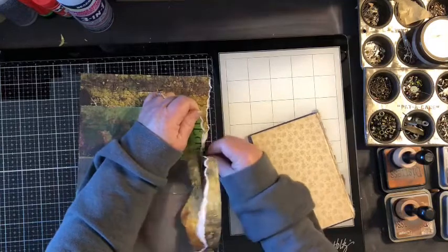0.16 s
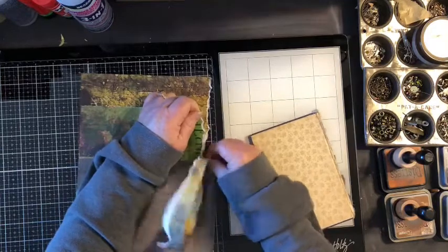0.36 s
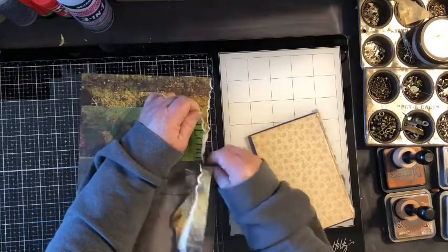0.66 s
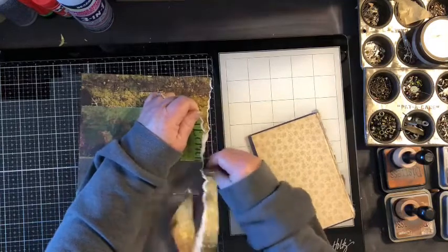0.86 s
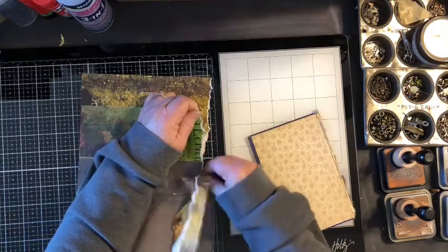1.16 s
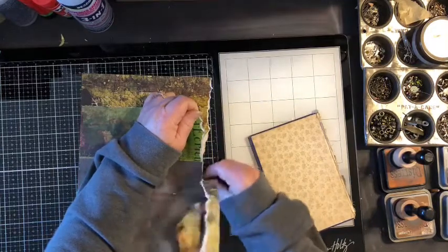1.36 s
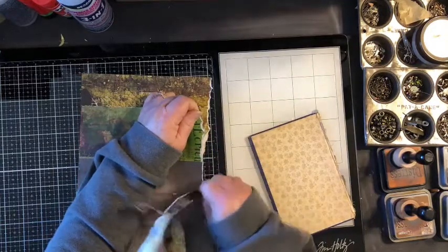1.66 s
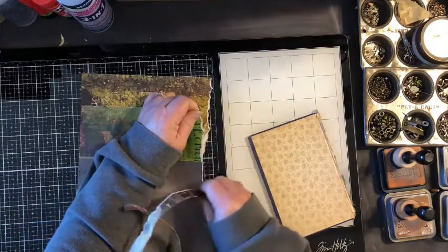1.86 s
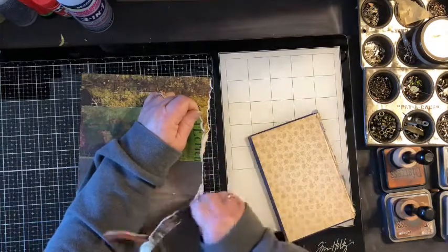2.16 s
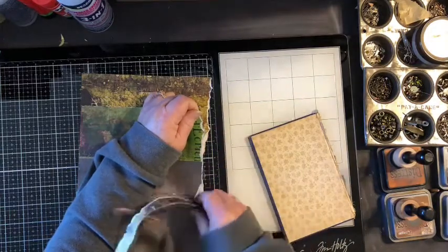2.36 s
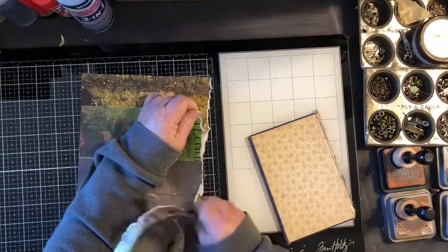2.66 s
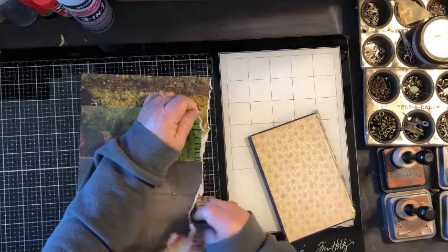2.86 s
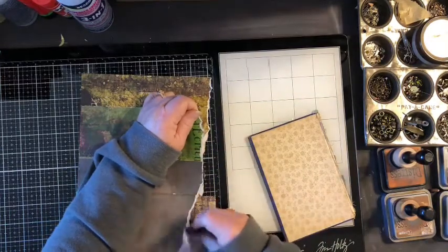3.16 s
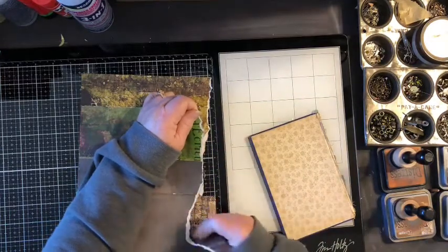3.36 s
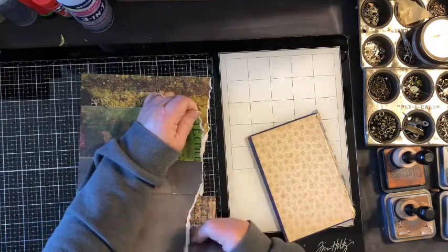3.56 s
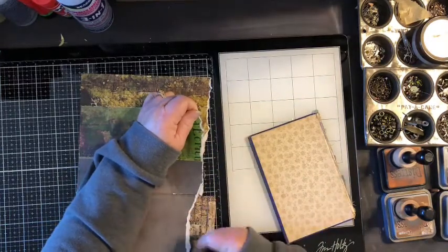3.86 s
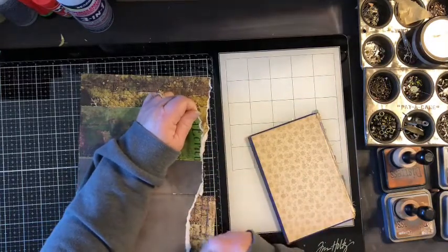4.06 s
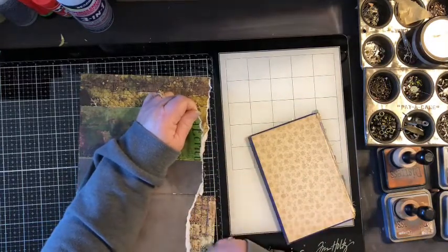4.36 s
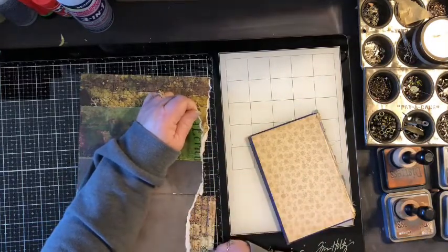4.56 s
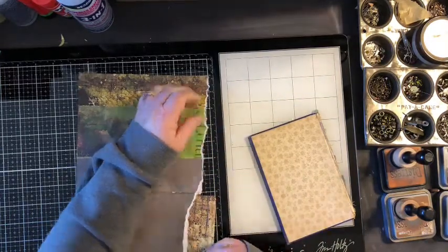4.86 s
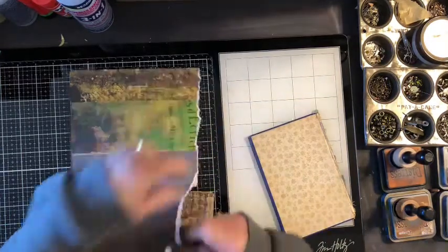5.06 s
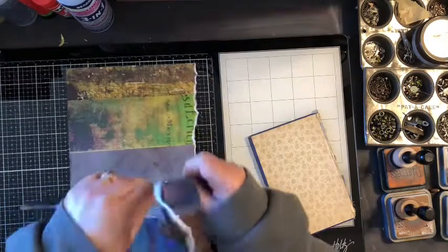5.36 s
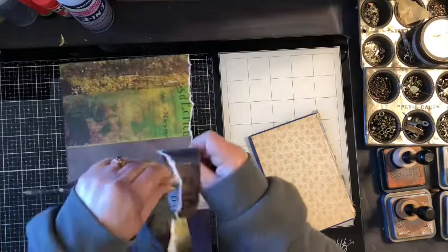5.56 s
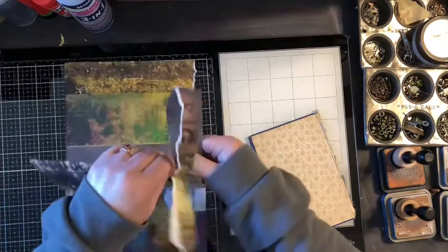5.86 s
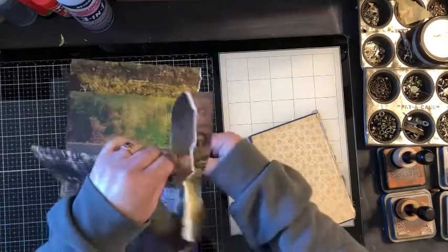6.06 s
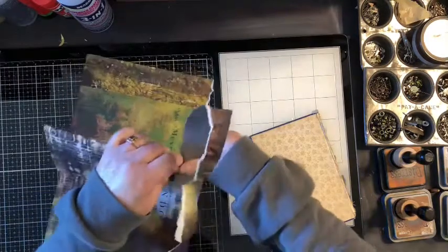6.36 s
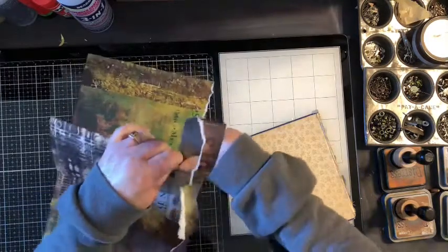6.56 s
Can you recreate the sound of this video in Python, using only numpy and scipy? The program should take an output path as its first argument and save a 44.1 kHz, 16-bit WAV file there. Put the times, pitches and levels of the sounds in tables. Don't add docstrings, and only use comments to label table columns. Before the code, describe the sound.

Close, dry ripping of a paper sheet in sticking, slipping tugs, with crease snaps, soft buckling knocks and rustle above a distant motor's low drone.

```python
import sys
import numpy as np
from scipy import signal
from scipy.fft import rfft, irfft, next_fast_len
from scipy.io import wavfile
from scipy.ndimage import uniform_filter1d

SR = 44100
rng = np.random.default_rng(int(sys.argv[2]) if len(sys.argv) > 2 else 0)


def how_loud(loudness_db):
    steps = np.asarray(loudness_db, float) / 20
    return 10 ** steps


def unload_audio(sound):
    columns = np.transpose(np.atleast_2d(sound))
    steps = np.round(np.clip(columns, -1, 1) * 32767)
    wavfile.write(sys.argv[1], SR, steps.astype(np.int16))


N = 296352
STEP = 16

# pitch_hz, density_db (per Hz)
PAPER_COLOUR = [(110, 12.5), (150, 1), (280, -5.5), (500, -2.5), (800, -4.5), (1260, 0), (1700, -2),
                (2400, -2), (3800, -1), (6500, -2.5), (9000, -6), (13000, -8.5), (16000, -9)]
# time_s, pitch_hz, whole_sheet_db (share that moves along)
LOOSE_STRIP = [(0, 2360, 7), (.55, 2700, 8), (1.2, 2600, 10), (1.45, 3430, 4.5), (1.7, 3040, 5.5),
               (1.93, 4230, 2), (2.3, 3170, 0), (2.7, 3960, 3), (2.92, 2290, 4), (3.08, 4300, 1),
               (3.32, 2000, 9), (3.46, 5300, -6), (3.6, 2600, 11.5), (3.8, 3380, 10.5), (3.97, 2770, 10),
               (4.3, 3520, 11.5), (5.3, 3400, 11.5), (6.72, 3150, 10.5)]


def fibres(per_s, spread_db, clump_db, patchy_db, rustle, strip_db):
    effort_db, bright_db = hands()
    bend_db = bending()
    strip_hz, sheet_db = np.array(in_time(LOOSE_STRIP))[:, ::STEP]
    flex_db = bend_db - 0.1 * effort_db
    body_db = sheet_db + 0.39 * bend_db - 0.16 * effort_db
    shift = [flex_db - flex_db.mean(), body_db - body_db.mean(), 0 * flex_db, bright_db - bright_db.mean()]

    sizes = how_loud(spread_db * np.minimum(rng.exponential(1, N), 4)) * rng.choice([-1, 1], N)
    clicks = sizes * (rng.random(N) < per_s / SR)
    source = rms_one(clicks) + rustle * rng.standard_normal(N)
    clumps_db = clump_db * (jitter(120.0) + 0.061 * jitter(320))
    flicker = [jitter(14.0) + 0.76 * drift(3.7)[::STEP] for k in range(5)]

    out, power = 0, 0
    for k, (hz, band) in enumerate(bands([source, -source])):
        place = np.interp(np.log(hz), np.log([320, 900, 2000, 5500, 9000]), [0, 1, 2, 2, 3])
        low = min(int(place), 2)
        colour_db = shift[low] + (place - low) * (shift[low + 1] - shift[low])
        colour_db += strip_db * np.exp(-(np.log(hz / strip_hz) / .24) ** 2)
        gain = how_loud(at_hz(PAPER_COLOUR, hz) + colour_db + clumps_db + patchy_db * flicker[k % 5])
        out = out + np.interp(np.arange(N) / STEP, np.arange(len(gain)), gain * how_loud(effort_db)) * band
        power += np.mean(gain ** 2) * np.mean(band ** 2)
    return how_loud(-3.0) * out / np.sqrt(power)


# start_s, length_s, effort_db, swell_db (start to end), brightness_db (of the fibres)
RIPS = [(.012, 0.045, -48, 4.5, -8), (.51, 0.059, -48, -10.5, -4), (.87, 0.097, -49, 3, -8),
        (1.4, 0.21, -51.5, 0, -2), (1.635, 0.11, -50, 0.5, -5.5), (1.79, 0.053, -49.5, 4, -2),
        (1.89, 0.08, -50, 4.5, 0), (1.99, 0.15, -46.5, 3.5, -6), (2.297, 0.02, -50, 4, 8),
        (2.37, 0.15, -55, -7, -2.5), (2.504, 0.061, -47, -5.5, -1), (2.76, 0.2, -49, 2.5, -3),
        (3.13, 0.083, -44.5, 8, 1), (3.23, 0.13, -47.5, -10.5, -3), (3.53, 0.16, -45, 2.5, -1.5),
        (3.815, 0.072, -50.5, 4, 2), (3.91, 0.077, -46.5, 10.5, -2.5), (3.99, 0.13, -46.5, 1, 1),
        (4.27, 0.12, -53, -3.5, 1.5), (4.4, 0.11, -56, 8, 2), (5.11, 0.066, -53.5, -5, -3),
        (6.07, 0.24, -51.5, -0.5, -5)]
# start_s, length_s, effort_db, swell_db
# (start to end), brightness_db (of the fibres)
RUSTLES = [(.08, 0.074, -56.5, -7, -8), (.185, 0.089, -54.5, -6, -4.5), (.3, 0.069, -55, 2, -4),
           (.66, 0.063, -55, 6.5, 3), (.75, 0.092, -52.5, 4.5, -7), (1.04, 0.12, -54, 3.5, 1),
           (1.19, 0.1, -54, 0, -6), (1.345, 0.047, -61, 17, 0), (2.2, 0.084, -54, -2, -1),
           (2.6, 0.14, -53.5, 7.5, -1), (3.04, 0.061, -51.5, 4, 0), (3.43, 0.088, -51.5, -1, 2.5),
           (4.55, 0.11, -60.5, -3, -3.5), (4.7, 0.082, -53, 11.5, -5.5), (4.8, 0.28, -52, 4.5, -6),
           (5.2, 0.019, -58, -15, 1), (5.283, 0.028, -54.5, -4, 4), (5.36, 0.096, -55, -4.5, -5.5),
           (5.56, 0.16, -56, 5, -3.5), (5.72, 0.11, -51.5, 2.5, -3), (5.875, 0.039, -55, 4, -6),
           (6.0, 0.16, -57.5, 3, -10), (6.38, 0.12, -54, -1, -7), (6.52, .2, -63, 7, -5),
           (0.4, 0.047, -63, 3, 1), (2.165, .03, -63, 2, 2), (2.985, 0.053, -59.5, 2, 0),
           (3.708, 0.096, -59.5, -9, -3), (4.18, 0.064, -66.5, 1, 2), (4.663, 0.033, -69, 19, -16),
           (5.513, 0.025, -64, 12, -13), (5.928, 0.053, -60.5, -7, -12), (1.752, 0.028, -63, -7, -2),
           (2.48, 0.012, -45, -10, 2), (1.854, 0.041, -58.5, 2, -4)]
SURGES = [
    (.49, 0.008, -41.5, 13, -4),
    (1.537, 0.0087, -45, 9, -5),
    (2.326, 0.011, -41.5, -11, -8.5),
    (3.543, 0.0072, -45.5, 5, 12),
    (4.13, 0.018, -44.5, 18.5, 1.5),
    (4.418, 0.0097, -42.5, 15, 3),
    (5.137, 0.011, -39.5, 3, -8),
    (5.226, 0.0059, -57.5, 21, 6),
]


def hands():
    t = np.arange(0, N, STEP) / SR
    power, bright = how_loud(2 * -96), 0
    # moves, rise in dB per s, fall in dB per s
    kinds = (RIPS, 900, 554), (RUSTLES, 1102, 700), (SURGES, 900, 3000)
    for rows, rise, fall in kinds:
        for s, length, effort_db, swell_db, bright_db in rows:
            db = effort_db + swell_db * (np.clip((t - s) / length, 0, 1) - .5)
            outside_db = rise * np.maximum(s - t, 0) + fall * np.maximum(t - s - length, 0)
            move = how_loud(2 * (db - outside_db))
            power = power + move
            bright = bright + move * bright_db
    return 10 * np.log10(power), bright / power


# middle_s, half_length_s, gain_db
BENDS = [(0.556, 0.068, 10.5), (0.722, 0.018, 13), (1.864, 0.022, 17.5), (2.385, 0.043, 10.5),
         (2.538, 0.087, 8.5), (2.895, 0.11, 10.5), (3.31, 0.066, 9), (3.653, 0.073, 2), (4.013, 0.07, 5.5),
         (4.477, 0.063, 8), (5.395, 0.09, 14), (5.3, 0.025, 12), (5.776, 0.036, 5)]


def bending():
    t = np.arange(0, N, STEP) / SR
    return sum(gain_db * np.exp(-((t - s) / half) ** 2) for s, half, gain_db in BENDS)


# middle_s, level_db (rms), pitch_hz
SLIPS = [(0.0396, -47, 1820), (0.0483, -50, 1570), (0.3622, -54, 2900), (0.5419, -53, 1220),
         (0.5523, -64, 1190), (0.6764, -50, 6030), (0.7068, -51, 4300), (0.7806, -49, 2900),
         (0.807, -60, 2800), (0.8395, -54, 2790), (0.8592, -50.5, 1300), (0.8848, -43, 2700),
         (0.9115, -46.6, 3490), (0.931, -49.5, 2740), (0.9465, -66, 2890), (0.9587, -44, 2110),
         (0.9725, -46, 2700), (1.1376, -55, 1230), (1.1882, -52.9, 1330), (1.2256, -49.1, 1780),
         (1.2388, -53, 2830), (1.2736, -48.7, 2620), (1.2843, -53, 1240), (1.3878, -50.5, 4070),
         (1.4134, -50.2, 3850), (1.4266, -49.1, 4930), (1.4415, -47.5, 2550), (1.4745, -53, 3960),
         (1.4869, -49.4, 3980), (1.4959, -44.5, 2410), (1.5132, -43.5, 3840), (1.5398, -43.5, 4870),
         (1.558, -44, 4030), (1.5721, -44.4, 2630), (1.589, -55, 2780), (1.6077, -56, 2700),
         (1.6264, -56, 2780), (1.6442, -48, 2710), (1.6569, -44, 3560), (1.6724, -44, 2680),
         (1.6906, -46, 2720), (1.7207, -42.5, 3660), (1.7391, -50, 4820), (1.7552, -56, 5500),
         (1.8166, -44.5, 3960), (1.9059, -44.5, 3770), (1.921, -37, 3400), (1.9663, -56, 4400),
         (1.9943, -48, 3950), (2.0203, -42.5, 3700), (2.0357, -42, 3040), (2.0527, -42.1, 2930),
         (2.07, -41, 3900), (2.0852, -43.9, 2900), (2.0964, -47, 3170), (2.1098, -51, 3820),
         (2.129, -50, 3120), (2.145, -54, 3030),
         (2.2226, -52, 7800), (2.248, -45.5, 5360), (2.2636, -48, 4660), (2.2963, -47, 3900),
                (2.3308, -37, 2970), (2.351, -54, 3490), (2.3748, -42, 2730), (2.4572, -41.5, 3340),
                (2.474, -47, 3450), (2.5029, -40, 3530), (2.519, -39, 2420), (2.5328, -40.5, 5000),
                (2.726, -55, 6100), (2.7663, -47, 5800), (2.7786, -42, 2470), (2.803, -34, 2260),
                (2.825, -40.5, 5800), (2.8389, -55, 2610), (2.8493, -50, 1750), (2.8583, -45.7, 1450),
                (2.8758, -50, 1790), (2.8994, -41, 1970), (2.914, -45, 1930), (2.9301, -40, 2000),
                (2.9413, -45, 2000), (2.9559, -50, 2000), (2.985, -53.5, 2720), (3.106, -47.5, 4230),
                (3.163, -46, 2630), (3.1764, -48, 2860), (3.1905, -39.5, 2580), (3.2144, -42, 1720),
                (3.2472, -41, 2020), (3.2597, -62, 1940), (3.2729, -39.7, 1900), (3.2834, -36.5, 1830),
                (3.3003, -41.5, 3160), (3.311, -41.5, 1830), (3.3247, -51, 1230), (3.3512, -46, 2270),
                (3.51, -52, 5150), (3.5456, -36.6, 3130), (3.558, -50, 3250), (3.5682, -37.5, 3210),
                (3.583, -41.5, 2020), (3.6151, -35.5, 2260), (3.6358, -38, 2090), (3.661, -42.5, 3060),
                (3.6758, -42, 2100), (3.6898, -49, 3000),
         (3.825, -49, 6100), (3.849, -46.5, 4370), (3.8603, -44, 4960), (3.885, -50.1, 4200),
              (3.9131, -54, 3700), (3.936, -50.0, 4350), (3.9795, -37, 3520), (3.9911, -38, 1800),
              (4.0418, -39, 4130), (4.0695, -41.5, 5730), (4.0952, -37, 3900), (4.105, -37.5, 3630),
              (4.147, -43, 4770), (4.2879, -50.4, 3800), (4.3006, -49.7, 6300), (4.3227, -47, 2320),
              (4.339, -48, 5700), (4.3693, -48, 4730), (4.3927, -51.8, 1850), (4.415, -42, 4670),
              (4.4488, -46, 1900), (4.5252, -48, 4110), (4.7576, -55, 3580), (4.772, -49.5, 1860),
              (4.9394, -49.5, 1330), (4.9734, -54, 3400), (5.1745, -49.5, 4000), (5.1865, -52.4, 1420),
              (5.3715, -56, 3840), (5.3877, -49.2, 4500), (5.4016, -51, 4960), (5.453, -45, 3570),
              (5.8027, -46, 4180), (5.9047, -50, 5800), (6.1273, -48.6, 4070), (6.234, -50.6, 4240),
              (6.2965, -47.5, 2390), (6.332, -48, 4820), (6.3497, -50.5, 3540), (6.3865, -53, 2240),
              (6.4146, -53.3, 4850),
         (1.931, -46, 4240), (1.94, -46, 4140), (1.953, -43, 4180), (2.011, -45, 2980),
               (3.2, -41, 3200), (3.227, -42, 2500), (3.239, -40, 2400), (3.625, -44, 2000),
               (3.963, -39.5, 2200), (4.003, -45, 1980), (4.013, -45, 4000), (4.078, -49, 5500),
               (4.117, -51, 5000), (4.138, -39, 5800), (3.445, -51, 5200), (3.489, -48, 6000),
               (1.7, -48, 2900), (2.814, -41, 2600)]


def slips():
    rise_s, fall_s, grains_per_s = .003, .0045, 9000
    ring_width = 0.27
    lead = SR // 100
    out, t = np.zeros(N + SR), np.arange(-lead, 4 * lead) / SR
    events = SLIPS
    draws = rng.random((len(events), len(t)))
    grains = rng.standard_normal(draws.shape) * (0.27 + 2 * (draws < grains_per_s / SR))
    swell = np.where(t < 0, np.exp(-(t / rise_s) ** 2), np.exp(-abs(t) / fall_s))
    bursts = grains * swell
    broad = rms_one(band_pass(bursts, 1300, 7000))
    top = 0
    for low_hz, high_hz in [(10200, 12000), (13200, 14300)]:
        patch_gain = how_loud(4.5 * rng.standard_normal((len(events), 1)))
        top = top + patch_gain * band_pass(bursts, low_hz, high_hz)
    top = rms_one(top)
    for (s, rms_db, hz), burst, wide, crisp in zip(events, bursts, broad, top):
        rung = resonance(resonance(burst, hz, 2 * ring_width * hz), hz, ring_width * hz)
        body = rms_one(rms_one(rung) + wide)
        at = round(s * SR)
        out[at:at + len(t)] += how_loud(rms_db - 10) * (body + how_loud(-12) * crisp)
    return out[lead:lead + N] * np.sqrt(np.mean(swell ** 2)) * 2.92


# start_s, level_db (peak), pitch_hz
CRACKS = [(.4619, -25, 5070), (.4996, -22, 3500), (.5112, -27, 1140), (1.073, -27, 1800),
          (1.1985, -27, 1680), (1.4521, -27.5, 3970), (2.4803, -22, 3370), (3.4055, -37, 1580),
          (4.424, -41, 1810), (4.4822, -27.5, 1070), (4.506, -36, 4300), (4.555, -46, 4000),
          (5.1512, -29, 3400), (5.236, -28.5, 4300), (5.271, -25.5, 2760), (5.2925, -24.5, 3700),
          (6.316, -31.5, 2180), (6.3749, -38, 3400), (6.6122, -37, 3200), (5.607, -36, 3500),
          (6.06, -40, 5000), (6.075, -34.5, 5000), (6.267, -36, 5000), (6.557, -42, 2900),
          (6.705, -43.5, 4000), (3.2699, -31, 1830), (1.5373, -50, 5150), (2.1275, -37, 2920),
          (2.3195, -27, 2910), (2.3954, -24, 2750), (4.4265, -32.5, 3700), (2.2946, -33, 4700)]
SPLITS = [(.197, -33, 1640), (.2468, -35.5, 1180), (1.3429, -37, 4400), (2.3955, -31.5, 2840),
          (2.4167, -27.5, 3430), (2.667, -34.5, 3440), (3.473, -27, 1720), (4.4038, -27.5, 1110),
          (4.636, -37.5, 3500), (5.1251, -35, 1750), (5.4795, -33, 2550), (5.7124, -25, 2940)]
CRACKLES = [
    (.026, -36, 1670),
    (.6677, -42, 4960),
    (2.3198, -40, 2970),
    (3.9499, -28.5, 2400),
    (4.8393, -31.5, 3300),
    (5.015, -32.5, 3580),
    (5.3591, -40, 1140),
    (6.0918, -32, 2820),
]


def snaps():
    out, t = np.zeros(N + SR), np.arange(SR // 12) / SR
    # events, crisp top in dB, decay by 60 dB in s
    kinds = (CRACKS, -8, .017), (SPLITS, -13, .032), (CRACKLES, -9, .07)
    high = signal.butter(2, 7000, "high", fs=SR, output="sos")
    for rows, top_db, decay_s in kinds:
        for s, peak_db, hz in rows:
            burst = rng.standard_normal(len(t)) * how_loud(-60 * t / decay_s) * np.minimum(t / 0.0001, 1)
            fold = rms_one(resonance(burst, hz, .18 * hz))
            body = .9 * fold + rms_one(band_pass(burst, 700, 6500))
            crisp = signal.sosfilt(high, burst)
            snap = body / abs(body).max() + how_loud(top_db) * crisp / abs(crisp).max()
            at = round(s * SR)
            out[at:at + len(t)] += how_loud(peak_db - 4.5) * snap
    return out[:N]


# start_s, level_db (peak), pitch_hz (the sweep ends at 0.78 of it)
KNOCKS = [(0.194, -49.5, 485), (0.511, -27.5, 699), (1.136, -46.5, 613), (2.292, -43.5, 780),
          (2.368, -57, 614), (2.816, -43.5, 540), (3.269, -50, 250), (3.322, -44, 206), (3.405, -46.5, 222),
          (3.472, -44.5, 360), (3.602, -44.5, 242), (3.954, -56, 258), (4.401, -37, 678), (4.473, -44, 720),
          (4.682, -57, 185), (5.124, -40.5, 708), (5.294, -38, 520), (5.355, -50.5, 367), (5.435, -50, 156),
          (5.476, -38, 990)]


def knocks():
    out, t = np.zeros(N + SR), np.arange(SR // 8) / SR
    for s, peak_db, hz in KNOCKS:
        sweep_hz = 0.781 * hz + 2600 * np.exp(-t / 0.002573)
        swell = np.minimum(0.17 + t / .005, 1)
        wave = np.sin(2 * np.pi * np.cumsum(sweep_hz) / SR) * swell * how_loud(-60 * t * hz / 30.0)
        rattle = rms_one(resonance(rng.standard_normal(len(t)), .5 * hz, hz))
        at = round(s * SR)
        out[at:at + len(t)] += how_loud(peak_db + 2.5) * wave * (1 + .5 * rattle)
    return out[:N]


# time_s, delay_ms, strength (0-1)
LIFTED_STRIP = [
    (0, .87, .25),
    (1.2, .87, .25),
    (1.4, .87, .5),
    (2.3, .87, .5),
    (2.9, .8, .15),
    (6.72, .85, .15),
]
# pitch_hz, width_hz, share (added)
HOLLOWS = [
    (878, 14, -1.37),
    (1140, 34, 0.31),
    (1800, 6.2, -0.098),
    (1876, 24, -1.1),
    (2700, 79, 0.094),
    (4820, 41, 0.77),
]


def desk(x):
    delay_ms, strength = in_time(LIFTED_STRIP)
    dull = signal.sosfiltfilt(signal.butter(1, 5500, fs=SR, output="sos"), x)
    x = x - strength * np.interp(np.arange(N) - np.round(delay_ms * SR / 1000), np.arange(N), dull)
    lag = round(0.0042 * SR)
    x = x + 0.11 * np.concatenate([np.zeros(lag), x[:-lag]])
    cupped = 2.07 / (1 + np.exp(14.0 * (np.arange(N) / SR - 2.21)))
    x = x + cupped * resonance(x, 1140, 140)
    return x + sum(share * resonance(x, hz, width_hz) for hz, width_hz, share in HOLLOWS)


def room(x):
    t60_s, wall_cut_hz = 0.19, 6100
    size = next_fast_len(N + SR)
    hz = np.fft.rfftfreq(size, 1 / SR)
    answer = 0
    for k, lag_s in enumerate(rng.uniform(0.0073, 0.026, 10)):
        loop = how_loud(-60 * lag_s / t60_s) / (1 + 1j * hz / wall_cut_hz) * np.exp(-2j * np.pi * hz * lag_s)
        answer = answer + (-1) ** k * loop / (1 - loop)
    return irfft(rfft(x, size) * answer, size)[:N]


# time_s, level_db
MOTOR_LEVEL = [
    (0, -57),
    (.6, -60.5),
    (2.38, -56),
    (2.79, -60),
    (3.9, -55.5),
    (4.7, -55.5),
    (5.1, -57.5),
    (6.72, -56),
]
MOTOR_HZ = [68.6, 88.0, 111.2]


def motor():
    t = np.arange(N) / SR
    levels = in_time(MOTOR_LEVEL) + [-61 - 3.5 * t, -68.5 - 1.5 * t]
    out = 0
    for hz, db in zip(MOTOR_HZ, levels):
        level = np.sqrt(2) * how_loud(db + 0.66 * drift(9.0))
        out = out + level * np.sin(2 * np.pi * hz * t + 0.26 * drift(2.2))
    return out


# pitch_hz, density_db (per Hz)
AIR_COLOUR = [(15, -31), (25, 1), (111, -2.5), (242, -12), (911, -20), (1100, -15), (1440, -39),
              (1940, -19), (2110, -20.5), (4870, -57), (5280, -33), (7510, -30.5), (16000, -41.5)]


def air():
    size = next_fast_len(N)
    hz = np.maximum(np.fft.rfftfreq(size, 1 / SR), 1)
    shape = how_loud(at_hz(AIR_COLOUR, hz) - 2.1 * (hz < 130))
    noise = irfft(rfft(rng.standard_normal(size)) * shape, size)[:N]
    return how_loud(-68.5) * noise / np.sqrt(np.mean(shape ** 2 * (hz > 150)))


def rms_one(x):
    return x / np.sqrt(np.mean(x ** 2) + 1e-20)


def in_time(rows):
    s, *columns = np.transpose(rows)
    return [np.interp(np.arange(N) / SR, s, c) for c in columns]


def at_hz(points, hz):
    points_hz, db = np.transpose(points)
    return np.interp(np.log(hz), np.log(points_hz), db)


def resonance(x, hz, width_hz):
    r = np.exp(-np.pi * width_hz / SR)
    ring = [1, -2 * r * np.cos(2 * np.pi * hz / SR), r * r]
    return signal.lfilter(np.array([1, 0, -1]) * (1 - r * r) / 2, ring, x)


def band_pass(x, low_hz, high_hz):
    return signal.sosfilt(signal.butter(2, [low_hz, high_hz], "band", fs=SR, output="sos"), x)


def bands(x):
    edges_hz = 120 * 2 ** np.arange(0, 7.5, 1 / 3)
    for k, (low, high) in enumerate(zip(edges_hz, edges_hz[1:])):
        yield np.sqrt(low * high), band_pass(x[k % 2], low, high)


def chance(rate_hz, length, settle):
    r = np.exp(-2 * np.pi * rate_hz * STEP / SR)
    return signal.lfilter([1], [1, -2 * r, r * r], rng.standard_normal(length + settle))[settle:]


def drift(rate_hz):
    slow = rms_one(chance(rate_hz, N // STEP + 1, 3000))
    return np.interp(np.arange(N) / STEP, np.arange(len(slow)), slow)


def jitter(rate_hz):
    fast = chance(rate_hz, -(-N // STEP), 1000)
    return rms_one(fast - uniform_filter1d(fast, size=SR // STEP // 20))


def scene():
    tearing = fibres(per_s=5500, spread_db=4.0, clump_db=1.0, patchy_db=2.4, rustle=.6, strip_db=6.0)
    paper = desk(tearing + snaps() + knocks() + slips())
    return (paper + how_loud(-15) * room(paper) + motor() + air())[None]


def top_cut(x):
    return signal.sosfilt(signal.butter(12, 16640, fs=SR, output="sos"), x)


def record(dry):
    x = signal.sosfilt(signal.butter(4, 50.3, "high", fs=SR, output="sos"), dry)
    x = signal.sosfilt(signal.ellip(12, .5, 62, 15870, fs=SR, output="sos"), x)
    x = x - .45 * resonance(x, 9300, 1600)
    return top_cut(x)


dry = scene()
out = record(dry)
unload_audio(out)
```